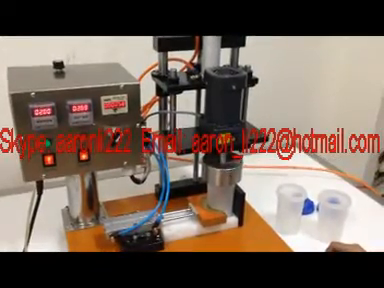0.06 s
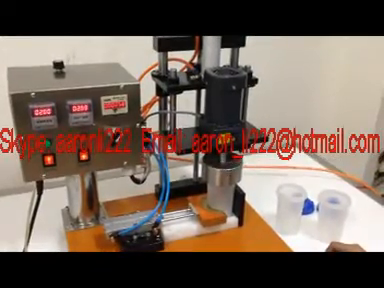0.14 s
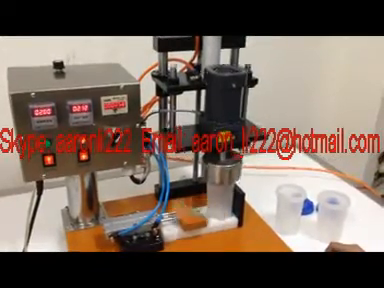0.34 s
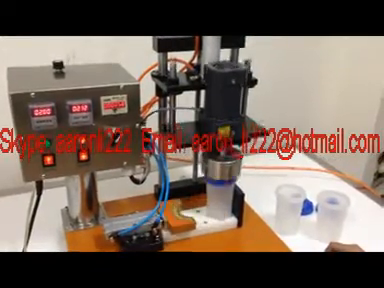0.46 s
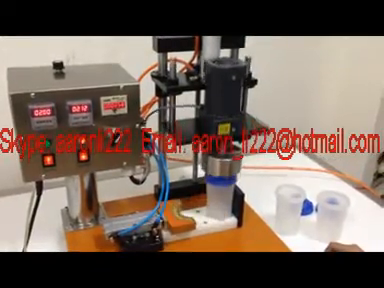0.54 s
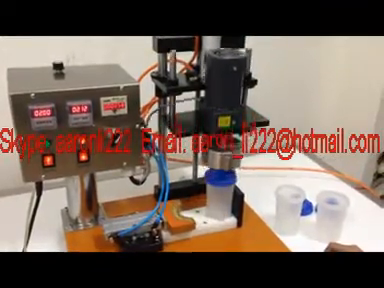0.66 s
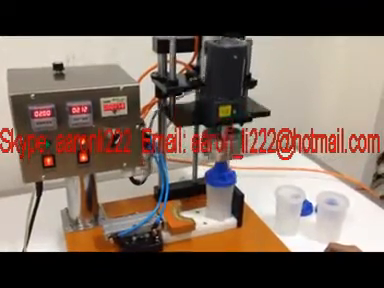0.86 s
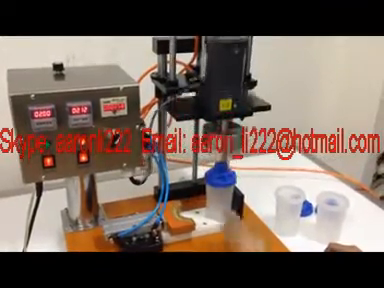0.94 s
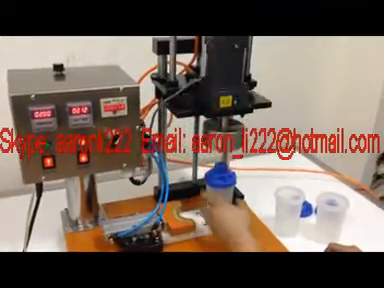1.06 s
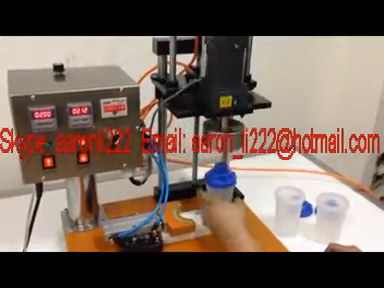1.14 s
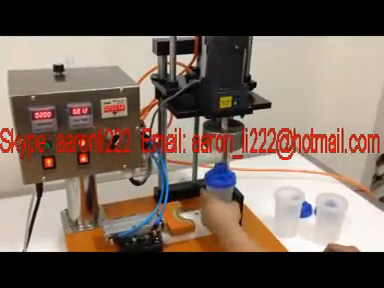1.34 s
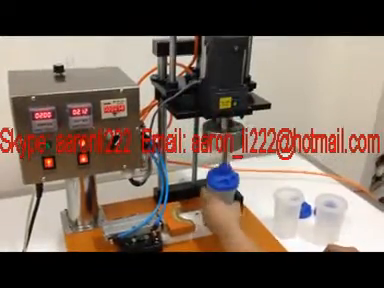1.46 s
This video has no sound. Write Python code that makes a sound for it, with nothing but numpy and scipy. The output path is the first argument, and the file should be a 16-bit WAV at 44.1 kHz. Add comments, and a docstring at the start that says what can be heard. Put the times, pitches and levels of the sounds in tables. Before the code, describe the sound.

Pneumatic bench machine clacks twice, hisses air, slams metal on metal, then thuds and falls quiet

```python
"""In a hard-walled workshop a quiet hum, coloured noise, runs throughout; one microphone hears a bench machine.
An air-driven capping machine lets go: the valve switches, clamp and head knock free, and exhaust air,
shaped noise, hisses through a silencer. The clamp slide slams into its stop and shudders on, over a thin
whine of sine partials. The head thuds home; a faint high hiss lingers, then fades. Blows are short pushes
ringing metal modes, each with a crack of noise; the mic is near enough that direct sound outweighs the room."""
import sys
import numpy as np
from scipy import signal
from scipy.fft import rfft, irfft
from scipy.io import wavfile
from scipy.ndimage import uniform_filter1d

SR = 44100
rng = np.random.default_rng(int(sys.argv[2]) if len(sys.argv) > 2 else 0)


def wrap_up_sound(samples):
    """Save the sound to the file named by the first command line argument, as 16-bit audio."""
    columns = np.atleast_2d(samples).T
    # keep every value between -1 and 1, then stretch to whole-number steps
    tamed = np.clip(columns, -1, 1)
    steps = np.round(tamed * 32767).astype(np.int16)
    wavfile.write(sys.argv[1], SR, steps)


N = 66150  # samples, 1.5 s


def undb(db):
    """Decibels to an amplitude factor."""
    return 10 ** (np.asarray(db) / 20)


def seconds():
    """The time of every sample."""
    return np.arange(N) / SR


def curve(table, col=1):
    """A table column joined by straight lines in time."""
    return np.interp(seconds(), [row[0] for row in table], [row[col] for row in table])


def decay(age, t60):
    """Exponential dying away, 60 dB down after t60 seconds."""
    return 1000. ** (-age / t60)


def noise(colour):
    """Noise of rms 1 with a (Hz, dB) colour, dark outside its ends."""
    hz, db = np.array(colour, float).T
    f = np.fft.rfftfreq(N, 1 / SR) + 1
    gain = undb(np.interp(np.log(f), np.log(hz), db))
    gain *= np.minimum(f / hz[0], 1) ** 3
    gain *= np.minimum(hz[-1] / f, 1) ** 6
    x = irfft(rfft(rng.standard_normal(N)) * gain, N)
    return x / x.std()


def band(x, hz, width):
    """One resonance of a given centre and width in Hz, rms 1."""
    y = signal.lfilter(*signal.iirpeak(hz, hz / max(width, 1), SR), x)
    return y / y.std()


def walk(rate):
    """Slow random wander, spread 1: noise averaged twice over 1 / rate seconds."""
    k = int(SR / rate)
    x = uniform_filter1d(uniform_filter1d(rng.standard_normal(N), k), k)
    return (x - x.mean()) / x.std()


def struck(blows, modes, colour, bloom=1e-5, punch_db=-20):
    """Each blow is a short push, heard itself and ringing the modes a little differently, plus a crack of noise."""
    out, grit = np.zeros(N), noise(colour)
    hz, db, t60 = np.array(modes, float).T[:, :, None]
    lucks = rng.standard_normal((len(blows), len(modes), 1))
    for (start, peak_db, contact, crack_db, crack_t60), luck in zip(blows, lucks):
        age = np.clip(seconds() - start, 0, None)[int(start * SR):]
        # luck shifts each mode's level (dB) and, in reversed order, its pitch
        tones = np.sin(2 * np.pi * hz * (1 + 0.0056 * luck[::-1]) * age)
        rings = -(undb(db + luck) * tones * decay(age, t60)).sum(axis=0)
        swell = 1 - np.exp(-(age / bloom) ** 2)
        # a longer contact softens the ring
        push = np.hanning(max(int(contact * SR), 1) + 2)[1:-1]
        ring = signal.fftconvolve(rings * swell, push)[:len(age)]
        ring /= np.abs(ring).max()
        ring[:len(push)] -= undb(punch_db) * push
        crack = grit[-len(age):] * (1 - np.exp(-age / 0.0007)) * decay(age, crack_t60)
        out[-len(age):] += undb(peak_db) * ring + undb(crack_db) * crack
    return out


# Colour of the workshop hum. Each row: frequency in Hz, density in dB per Hz.
HUM_COLOUR = [(40, 8), (124, -4), (196, -7.5), (463, -10.5), (644, -14.5), (1730, -12.5), (2500, -20),
              (2940, -24), (12800, -32.5)]


def hum():
    """Steady coloured noise whose level wanders slightly."""
    level_db = -44.5 + 1.0 * walk(8.1)
    return undb(level_db) * noise(HUM_COLOUR)


# Valve and head knocking on the frame. Each row: start in seconds, ring peak in dB, contact in seconds,
# crack level in dB, crack t60 in seconds.
FRAME_KNOCKS = [(.233, -51, 0.00032, -26.5, 0.38), (.2452, -7, 0.00048, -10.5, 0.11),
                (.367, -7, 0.00071, -11, 0.067), (.389, -37, 0.001, -23.5, 0.22),
                (.414, -21, 0.0016, -26, 0.019), (.426, -18.5, 0.00078, -33.5, 0.34)]
# Modes of the frame. Each row: frequency in Hz, level in dB, t60 in seconds.
FRAME_MODES = [(168, -5.5, 0.18), (227.8, -4, 0.32), (312.4, -7.5, 0.5), (390.4, 10.5, 0.069),
               (445.6, 1, 0.089), (636, -1.5, 0.16), (1095, -0.5, 0.17), (1717, 8, 0.12),
               (2464, 18.5, 0.053), (4600, 0, .045), (5030, 0, .04)]
# Colour of the frame's crack. Each row: frequency in Hz, density in dB per Hz.
FRAME_CRACK_COLOUR = [(200, -1), (390, -2), (972, -5.5), (1300, -12), (2370, -3), (2970, -17), (4830, -3),
                      (5460, -8), (12800, -22)]


def knocks():
    """The frame rings under the valve and head, and the push itself is heard strongly."""
    return struck(FRAME_KNOCKS, FRAME_MODES, FRAME_CRACK_COLOUR, punch_db=4)


# Decay of the hard-walled workshop. Each row: frequency in Hz, t60 in seconds.
ROOM_DECAY = [(100, 0.53), (400, 0.79), (1500, 0.21), (5000, 0.28), (12000, 0.6)]


def room(x):
    """Dense reflections build up, then die away octave by octave, the low mids last."""
    t = seconds()
    hz, t60s = np.array(ROOM_DECAY).T
    build = 1 - np.exp(-(t / 0.018) ** 2)
    tail = np.zeros(N)
    for f in 60 * 2. ** np.arange(8):
        t60 = np.interp(np.log(f), np.log(hz), t60s)
        octave = band(rng.standard_normal(N), f, 0.46 * f)
        # this weight gives each octave energy in proportion to its width
        tail += octave * np.sqrt(f / t60) * decay(t, t60) * build
    return signal.fftconvolve(x, tail / np.sqrt(np.sum(tail ** 2)))[:N]


# A resonance of the emptying cylinder that climbs as the stroke ends.
# Each row: time in seconds, centre in Hz, share in dB.
CHAMBER_COURSE = [(.95, 4250, -10.5), (1.04, 4394, -10), (1.11, 5400, 1), (1.16, 4990, -20)]


def chamber():
    """A band of noise with a moving centre: two slow wanders carried on a cosine and a sine."""
    wander_hz = 1100  # a faster wander widens the band
    turn = 2 * np.pi * np.cumsum(curve(CHAMBER_COURSE)) / SR
    moving = walk(wander_hz) * np.cos(turn) + walk(wander_hz) * np.sin(turn)
    return undb(curve(CHAMBER_COURSE, 2)) * moving


# Exhaust air. Each row: time in seconds, flow level in dB, share of the 5-7 kHz hiss in dB,
# share of the top sizzle in dB.
AIR_FLOW = [(.246, -24.5, -16, 0), (.349, -29, -5.5, -21), (.356, -23.5, -2, -8), (.42, -25.5, -21, -30),
            (.5, -29.5, -10, -20), (.6, -31, -9, -18.5), (.95, -32, -8, -18), (1.04, -32, -8, -17),
            (1.11, -34, -3.5, -16), (1.156, -29.5, -15, -20), (1.172, -44.5, -4, -8), (1.32, -48, -8, -6),
            (1.44, -64.5, -20, -28.5)]
# Colour of the jet. Each row: frequency in Hz, density in dB per Hz.
JET_COLOUR = [(120, -6.5), (300, -14.5), (520, -18.5), (1170, -7.5), (1800, -5), (2810, -10), (4160, 0.5),
              (6500, -12.5), (8500, -27.5)]
# Resonances of the silencer. Each row: frequency in Hz, width in Hz, level in dB.
SILENCER_RESONANCES = [(2333, 38, -10), (3990, 40, -23), (4320, 74, -9.5), (4517, 26, -14.5)]


def exhaust():
    """Jet noise through the silencer; it drops when the valve shuts, and a faint high hiss lingers, then fades."""
    white = rng.standard_normal(N)
    jet = noise(JET_COLOUR)
    for hz, width, db in SILENCER_RESONANCES:
        jet += undb(db + 0.65 * walk(7.3)) * band(white, hz, width)
    hiss = undb(curve(AIR_FLOW, 2)) * noise([(4700, -10.5), (5300, -2.5), (6500, 1.0)])
    sizzle = undb(curve(AIR_FLOW, 3)) * noise([(7500, 2.5), (12800, 1.0)])
    flutter = undb(.7 * walk(30))
    flow = (seconds() > AIR_FLOW[0][0]) * undb(curve(AIR_FLOW))
    return flow * flutter * (jet + chamber() + hiss + sizzle)


# Blows and bounces of the clamp slide on its stop. Each row: start in seconds, ring peak in dB,
# contact in seconds, crack level in dB, crack t60 in seconds.
SLIDE_SLAMS = [(.592, -57, .0001, -24, 0.27), (.6005, 0.5, 0.0001, -5, 0.073),
               (.6118, -15.5, 0.00017, -22, 0.017), (.634, -11.5, 0.00092, -24, 0.046),
               (.655, -9.5, 0.00014, -23, 0.1), (.708, -58, 0.00026, -22, 0.17),
               (.727, -27, 0.00098, -54, 0.075)]
# Modes of the slide and base plate. Each row: frequency in Hz, level in dB, t60 in seconds.
SLIDE_MODES = [(267, -10.5, 0.62), (411, 5.5, 0.21), (494.6, -3, 0.34), (766.5, 8.5, 0.14), (1135, 6, 0.17),
               (1586, 9, 0.11), (1697, 10.5, 0.05), (1938, 12, 0.057), (2510, -2, 0.046),
               (2440, 16.5, 0.04)]
# Colour of the slide's crack. Each row: frequency in Hz, density in dB per Hz.
SLIDE_CRACK_COLOUR = [(200, -18.5), (415, -11.5), (770, 3), (1000, -6.5), (1640, 1.5), (2300, -7),
                      (2700, -46)]


def slams():
    """The slide hits its stop and bounces, ringing itself and the base plate."""
    return struck(SLIDE_SLAMS, SLIDE_MODES, SLIDE_CRACK_COLOUR)


# Partials of the thin whine. Each row: multiple of the pitch, level in dB.
WHINE_PARTIALS = [(1, 2), (2, -3.5), (3, -3.5)]
# Course of the whine. Each row: time in seconds, pitch in Hz, level in dB.
WHINE_PATH = [(.6, 596, -79), (.64, 599.5, -31.5), (.74, 600.6, -34.5), (.9, 600, -44),
              (1.15, 602.6, -42.5), (1.26, 610, -38.5), (1.37, 597, -52.5), (1.41, 594, -61)]


def whine():
    """Clean sine partials; the upper ones waver more."""
    turn = 2 * np.pi * np.cumsum(curve(WHINE_PATH)) / SR
    partials = sum(undb(db + .8 * k * walk(14)) * np.sin(k * turn) for k, db in WHINE_PARTIALS)
    return undb(curve(WHINE_PATH, 2)) * partials


# Resonances of the loose slide. Each row: frequency in Hz, width in Hz, level in dB.
SHUDDER_RESONANCES = [(765, 26, -3.5), (1204, 21, -4), (1690, 51, -1)]


def shudder():
    """Uneven chatter in the slide's resonances after the slam, dying away."""
    start_s, level_db, rise_s, t60_s = 0.641, -30, 0.022, 0.93
    age = np.clip(seconds() - start_s, 0, None)
    rings = np.zeros(N)
    for hz, width, db in SHUDDER_RESONANCES:
        rings += undb(db + 1.9 * walk(20)) * band(rng.standard_normal(N), hz, width)
    return undb(level_db) * (1 - np.exp(-age / rise_s)) * decay(age, t60_s) * rings


# The head reaching the top of its stroke. Each row: start in seconds, ring peak in dB, contact in seconds,
# crack level in dB, crack t60 in seconds.
HEAD_THUDS = [(1.1575, -14, 0.00034, -30, 0.47)]
# Modes of the head bracket. Each row: frequency in Hz, level in dB, t60 in seconds.
BRACKET_MODES = [(123.6, -2, 0.084), (301.5, -6.5, 0.12), (405, -1, 0.14), (922.4, 8, 0.055),
                 (1440, 0.5, 0.05)]
# Colour of the bracket's crack. Each row: frequency in Hz, density in dB per Hz.
BRACKET_CRACK_COLOUR = [(100, 2), (411, -2.5), (700, -7), (930, -2), (1150, -7.5), (2500, -12)]


def thud():
    """The head comes home and its bracket's ring swells up softly."""
    return struck(HEAD_THUDS, BRACKET_MODES, BRACKET_CRACK_COLOUR, bloom=.009)  # seconds


def scene():
    """The machine heard directly, the workshop's answer, the whine and the hum, alike in both channels."""
    room_db, thud_send_db = -9.5, -3  # the thud stirs the room less than the hard blows
    machine = knocks() + exhaust() + slams() + shudder()
    head = thud()
    reflections = undb(room_db) * room(machine + undb(thud_send_db) * head)
    mono = machine + head + reflections + whine() + hum()
    return np.array([mono, mono])


def record(dry):
    """The microphone loses the deep bass, loud peaks are rounded, the top is cut."""
    low_hz, top_hz = 107.5, 12650
    bass_cut = signal.butter(2, low_hz, "high", fs=SR, output="sos")
    top_cut = signal.ellip(10, .2, 80, top_hz, fs=SR, output="sos")
    rounded = np.tanh(0.76 * signal.sosfilt(bass_cut, dry)) / 0.86
    return signal.sosfilt(top_cut, rounded)


dry = scene()
out = record(dry)
wrap_up_sound(out)
```